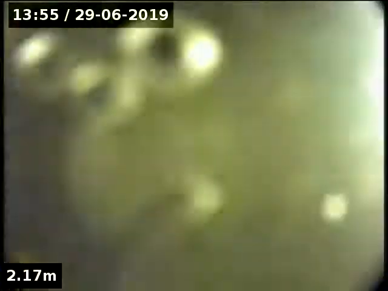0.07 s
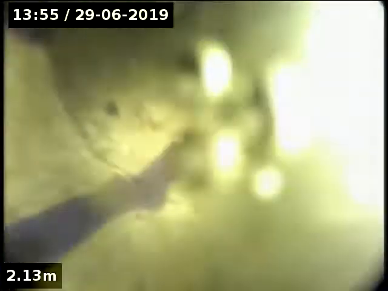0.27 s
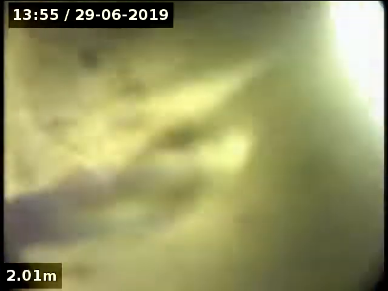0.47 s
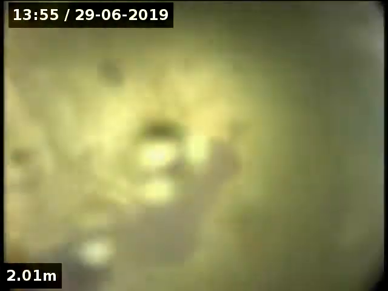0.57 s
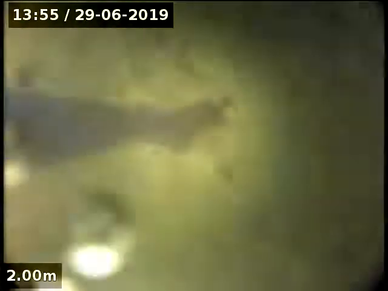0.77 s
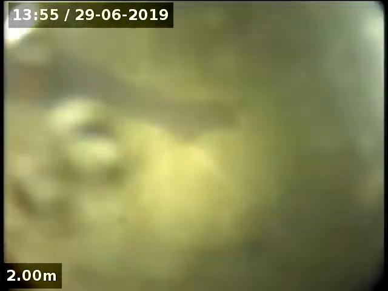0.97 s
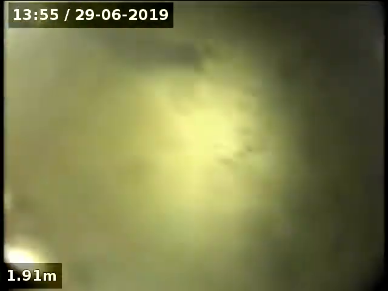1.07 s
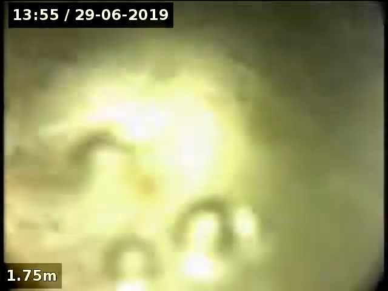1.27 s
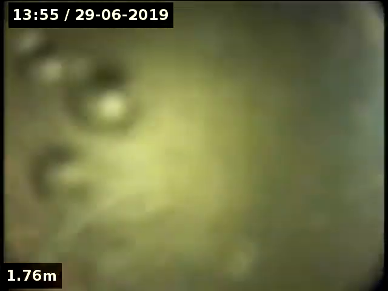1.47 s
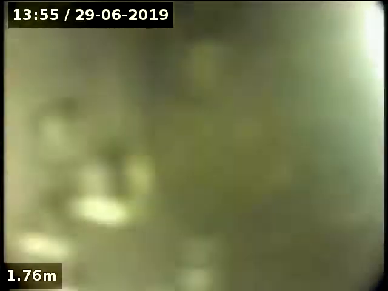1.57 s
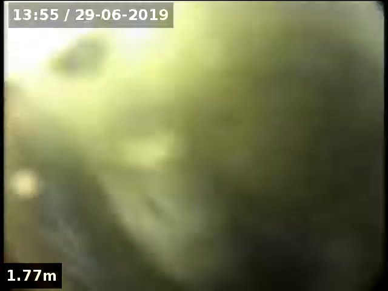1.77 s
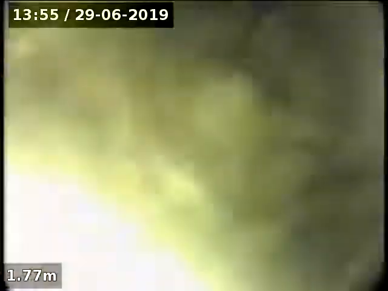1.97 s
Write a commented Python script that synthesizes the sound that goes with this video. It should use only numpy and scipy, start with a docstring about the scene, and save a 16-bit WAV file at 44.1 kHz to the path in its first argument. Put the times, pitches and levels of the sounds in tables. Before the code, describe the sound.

A flexible rod drags through a drain pipe, heard close on a small, hissy microphone. Faint hollow rubs and a short bright scrape come around 0.1 s, bumps at 0.2 s, sparse thuds and a light knock at 0.5-0.6. Hard, rattling knocks cluster at 0.85-1.1, loudest near 1.03, with another at 1.16. Sound drops out at 1.37-1.48; muffled bumps follow from 1.6 to 1.9.

```python
"""Rod dragged through a drain pipe

A flexible rod is drawn back through a drain pipe, heard by a small cheap recorder.
Short pushes make dull bumps and rattles in the recorder's case; filtered noise makes the drag and scrape.
Brief tones are the rod's rubs. One light knock and three hard ones, each of one or more contacts, ring the reel.
The recorder hisses, bends loud peaks upwards, has a deep notch at 4 kHz, ticks once and drops out once."""
import sys
import numpy as np
from scipy import signal
from scipy.fft import rfft, irfft, next_fast_len
from scipy.io import wavfile
from scipy.ndimage import uniform_filter1d

SR = 44100
rng = np.random.default_rng(int(sys.argv[2]) if len(sys.argv) > 2 else 0)


def convert_level_to_amplitude(level_db):
    """Map a level in decibels to its linear amplitude factor."""
    exponent = np.asarray(level_db, float) / 20
    return 10 ** exponent


def dump_mix(stems):
    """Bounce the given channels to the path in sys.argv[1] as a 16-bit WAV at rate SR."""
    frames = np.atleast_2d(stems).T  # one column per channel
    limited = np.clip(frames, -1, 1)  # hard clip at full scale
    pcm = np.round(limited * 32767).astype(np.int16)
    wavfile.write(sys.argv[1], SR, pcm)


N = 88332
T = np.arange(N) / SR


def curve(rows):
    """Gain over time, drawn straight in dB between (t/s, level/dB) points."""
    t, db = np.array(rows, float).T
    return convert_level_to_amplitude(np.interp(T, t, db))


def colour(x, rows):
    """Make some pitches louder than others, following (f/Hz, level/dB) points."""
    pad = 4096  # mirrored sound at both ends keeps the filter from wrapping round
    size = next_fast_len(N + 2 * pad)
    f, db = np.array(rows, float).T
    hz = np.fft.rfftfreq(size, 1 / SR) + 1  # 1 Hz up, so the logarithm exists at zero
    gain = convert_level_to_amplitude(np.interp(np.log(hz), np.log(f), db))
    spectrum = rfft(np.pad(x, pad, "reflect"), size)
    return irfft(spectrum * gain, size)[pad:pad + N]


def unit(x):
    """Scale to an rms of 1, so that a level can be set afterwards."""
    return x / np.sqrt(np.mean(x ** 2))


def ring(x, hz, t60, phase=0.):
    """One tone set off by x, falling 60 dB in t60 seconds."""
    pole = np.exp(2j * np.pi * hz / SR - np.log(1000) / (t60 * SR))
    return signal.lfilter([np.exp(1j * phase)], [1, -pole], x).imag


def pushes(times, sizes, ms):
    """Bell-shaped pushes, ms wide at half height."""
    near = np.arange(-128, 129)  # samples around each push
    i = np.clip((times * SR).astype(int)[:, None] + near, 0, N - 1)
    offset_ms = (i / SR - times[:, None]) * 1000
    shape = np.exp(-4 * np.log(2) * (offset_ms / ms[:, None]) ** 2)
    return np.bincount(i.ravel(), (sizes[:, None] * shape).ravel(), N)


def flicker(rate, spread_db):
    """Random wander of a level: rate dB values a second, smoothed into each other."""
    k = int(SR / rate)
    steps = np.repeat(rng.standard_normal(N // k + 1), k)
    return convert_level_to_amplitude(spread_db * uniform_filter1d(steps, k)[:N])


# dull bumps, before the case shapes them: t/s, peak level/dB,
# width at half height/ms (held to 0.5-3), direction (+1 or -1)
BUMPS = [(0.0055, -20, 0.95, 1), (0.1976, -28.5, 0.39, 1), (0.211, -25, 1.8, -1), (0.2229, -22.5, 1.3, 1),
         (0.2304, -15, 0.68, 1), (0.2369, -32, 0.44, 1), (0.2547, -22, 0.59, -1), (0.4957, -18, 2.1, 1),
         (0.539, -15, 1.3, -1), (0.5552, -19.5, 1.4, 1), (0.7818, -21, 0.24, 1), (0.8315, -18.5, 0.9, -1),
         (0.8415, -15, 1.1, 1), (0.8483, -11, 1.24, 1), (0.8568, -22, 1.2, -1), (0.8766, -18, 0.38, 1),
         (0.8982, -29, 0.73, -1), (0.9042, -11, 0.56, 1), (0.9139, -17, 0.8, -1), (0.9271, -20, 0.6, 1),
         (0.9355, -20.5, 0.47, 1), (0.9461, -23.5, 0.73, 1), (0.9532, -21, 0.8, 1), (0.9847, -9, 0.91, 1),
         (0.9943, -8.5, 0.66, 1), (0.9998, -22, 0.38, -1), (1.0095, -2.5, 1.23, 1), (1.0208, -6, 0.84, 1),
         (1.0268, -7.5, 1.1, -1), (1.0463, -14, 0.49, 1), (1.0578, -28, 0.7, -1), (1.0735, -11, 1.35, 1),
         (1.0843, -13.5, 1.1, 1), (1.279, -18, 1.63, -1), (1.5615, -24, 0.42, 1), (1.6181, -17.5, 0.9, 1),
         (1.6288, -14.5, 1.4, 1), (1.6418, -25, 1.2, 1), (1.6536, -12.5, 0.58, -1),
         (1.6674, -10.5, 1.26, 1), (1.6781, -24, 0.8, -1), (1.6869, -9, 0.78, 1), (1.6935, -24, 0.72, -1),
         (1.7041, -18, 0.93, 1), (1.7623, -10.5, 2.6, 1), (1.7697, -17, 2.6, -1), (1.7812, -13, 1.13, 1),
         (1.7945, -19, 1.0, -1), (1.8439, -16, 1, -1), (1.8595, -19.5, 1.4, -1), (1.8658, -18, 1.1, 1),
         (1.8951, -18.5, 2.3, -1)]
# how hard the rod rattles, rms of the small random bumps before the case: t/s, level/dB
RATTLE = [(0, -24), (.03, -41), (.07, -52), (.09, -33), (.14, -48), (.21, -19), (.27, -44.5), (.47, -45.5),
          (.5, -45), (.55, -32.5), (.6, -41.5), (.8, -52.5), (.84, -26), (.91, -24), (.95, -33.5),
          (1.01, -12.5), (1.08, -36), (1.11, -49.5), (1.26, -44.5), (1.28, -25.5), (1.31, -49.5),
          (1.53, -52), (1.56, -26), (1.59, -39.5), (1.62, -28), (1.69, -22), (1.72, -47), (1.75, -27),
          (1.79, -27.5), (1.81, -34), (1.86, -23), (1.88, -42), (1.9, -30.5), (1.92, -70), (2, -61)]
# how the case passes a push: f/Hz, level/dB
CASE_RESPONSE = [(20, -37.5), (60, -23.5), (120, -6.5), (190, 1), (300, 2.5), (1000, 1.5), (9000, -1.5)]


def case():
    """Pushes pass straight to the microphone, lose their lows and ring the case briefly."""
    case_hz, case_t60_s, case_ring_db = 222, 0.013, -11.5
    rattles_per_s, rattle_ms = 420, 1.198  # each rattle is 0.56 to 1.63 times this long
    t, db, ms, direction = np.array(BUMPS, float).T
    bumps = pushes(t, np.sign(direction) * convert_level_to_amplitude(db), np.clip(ms, .5, 3))

    chance = rng.random((int(rattles_per_s * N / SR), 4))
    times = (130 + chance[:, 0] * (N - 260)) / SR
    sizes = np.where(chance[:, 1] < .6, 1, -1) * (0.84 + chance[:, 2])
    rattle = pushes(times, sizes, rattle_ms * (0.56 + 1.07 * chance[:, 3]))

    x = bumps + unit(rattle) * curve(RATTLE)
    ring_gain = convert_level_to_amplitude(case_ring_db) * 2 * np.pi * case_hz / SR
    x = x + ring_gain * ring(x, case_hz, case_t60_s, 1.47)
    return colour(x, CASE_RESPONSE)


# how strongly the rod drags along the pipe wall, before the recorder: t/s, level/dB
DRAG = [(0, -34), (.07, -35.5), (.13, -32.5), (.19, -29.5), (.25, -32), (.3, -39.5), (.45, -52),
        (.57, -43.5), (.59, -33), (.63, -50), (.72, -36.5), (.78, -33), (.83, -37), (.9, -26), (.96, -31),
        (1.0, -28.5), (1.06, -38), (1.12, -42), (1.14, -53), (1.19, -33.5), (1.25, -50), (1.36, -44.5),
        (1.48, -53.5), (1.66, -39.5), (1.73, -51.5), (1.93, -51), (2, -56)]
# resonances of the pipe: f/Hz, nominal width/Hz, relative level/dB
PIPE = [(300, 150, -20.5), (588, 120, 6), (830, 230, 5.5), (1156, 410, -2.5), (1600, 120, -9),
        (2240, 290, -25.5)]


def drag():
    """Stick-slip grit rings the pipe's resonances, each wandering in level on its own."""
    # steady noise in which about one sample in a hundred is much larger
    grit = rng.standard_normal(N) * (0.61 + (rng.random(N) < .01) * 4)
    x = 0
    for hz, width, db in PIPE:
        x = x + convert_level_to_amplitude(db) * flicker(40.18, 4.3) * unit(ring(grit, hz, 2.9 / width))
    x = colour(x, [(20, -3), (2600, 0), (4000, -22.5), (9000, -51)])
    return unit(x) * curve(DRAG)


# colour of the steady hiss: f/Hz, relative level/dB per Hz
HISS = [(20, -25), (40, -15), (100, -6), (200, 1.5), (500, -0.5), (900, 0.5), (1500, -6.5), (2300, -15.5),
        (3100, -29), (3600, -28.5), (4000, -51.5), (5000, -69)]
# level of the hiss between 1 and 3 kHz, before its wander and the recorder: t/s, level/dB
SWELL = [(0, -38), (.05, -63), (.3, -51.5), (.6, -51.5), (.7, -53.5), (1.48, -55.5), (1.65, -46),
         (1.75, -51), (1.9, -49.5), (1.97, -43.5), (2, -44)]


def hiss():
    """Steady noise floor, with a middle band that swells now and then."""
    floor = unit(colour(rng.standard_normal(N), HISS)) * convert_level_to_amplitude(-44) * flicker(12, 1.1)
    middle = colour(rng.standard_normal(N), [(600, -37), (1300, -1.5), (1800, 1), (2200, -1.5),
                                             (2700, -12.5), (3400, -17.5), (4500, -54.5)])
    return floor + unit(middle) * curve(SWELL) * flicker(30, 4.3)


# colour of the high hiss: f/Hz, relative level/dB per Hz
TOP_HISS = [(2500, -35.5), (4100, -3), (4900, -8.5), (6800, -0.5), (7600, -7), (8300, -19.5), (9000, -49)]
# rise and fall of the high hiss around its base level: t/s, level/dB
TOP_SWELL = [(0, 8), (.06, -2), (.3, -2.5), (.5, 3.5), (.7, 3), (1.0, 6), (1.3, 0.5), (1.5, 3), (1.6, -2.5),
             (1.68, 7.5), (1.75, 1), (2, 2.5)]


def top_hiss():
    """Very faint treble noise that slowly comes and goes."""
    base_db = -69
    return unit(colour(rng.standard_normal(N), TOP_HISS)) * convert_level_to_amplitude(base_db) * curve(TOP_SWELL)


# low rumble, before its wander and the recorder: t/s, level/dB
RUMBLE = [(0, -53.5), (.1, -46), (.3, -60), (.37, -50), (.44, -61), (.52, -46.5), (.62, -65), (.74, -52.5),
          (.8, -64.5), (1.3, -61), (1.48, -61), (1.56, -42.5), (1.65, -53.5), (1.8, -52), (1.92, -53.5),
          (2, -66)]


def rumble():
    """A faint rumble: noise kept mostly below 150 Hz."""
    low = colour(rng.standard_normal(N), [(25, -12.5), (70, 7), (130, 8), (220, -32)])
    return unit(low) * curve(RUMBLE) * flicker(16, 3)


# short tonal rubs of the rod on the wall: t/s, length/s, f/Hz, level/dB (before the wander)
RUBS = [(0.03, .016, 518, -28.5), (0.047, 0.017, 548, -28), (.134, 0.015, 510, -27),
        (0.152, 0.014, 840, -27), (0.234, 0.0128, 677, -26.5), (0.776, 0.0075, 556, -29),
        (0.879, 0.007, 2600, -30.5)]


def rubs():
    """Each rub is a brief, slightly unsteady tone that swells and fades."""
    out = 0
    for start, length, hz, db in RUBS:
        s = T - start
        env = np.abs(np.sin(np.pi * np.clip(s / length, 0, 1))) ** 1.4
        out = out + convert_level_to_amplitude(db) * env * np.sin(2 * np.pi * hz * s) * np.sqrt(2)
    return out * flicker(150, 1.4)


# colour of the scrape: f/Hz, relative level/dB per Hz
SCRAPE = [(300, -36.5), (1200, -12), (1750, 1), (2100, -10.5), (2700, -3), (3100, 4.5), (3500, -14.5),
          (4500, -12), (5200, -6), (6000, -11), (6900, -11), (7500, -19), (8200, -20), (9000, -46)]


def scrape():
    """A bright hiss of noise that rises fast, holds and dies away."""
    start_s, rise_s, hold_s, fall_db_per_s, level_db = 0.074, 0.051, 0.043, 132.5, -39.5
    s = T - start_s
    rise = np.clip(s / rise_s, 0, 1) ** 0.49
    fall = convert_level_to_amplitude(-fall_db_per_s * np.clip(s - rise_s - hold_s, 0, 9))
    noise = unit(colour(rng.standard_normal(N), SCRAPE))
    return noise * rise * fall * flicker(90, 1.5) * convert_level_to_amplitude(level_db)


# hard contacts of the knocks, used by knocks() and snap(): t/s, strength level/dB, contact width/ms
KNOCKS = [(.5865, -27.5, 0.89), (.8795, -13.5, 0.25), (.8815, -15, 0.23), (.8836, -13.5, 0.28),
          (.8865, -6.5, 0.3), (.8905, -12, .45), (.8958, -13.5, 0.32), (.9072, -8, 0.71),
          (1.0337, -10.5, 0.38), (1.0352, -10, 0.21), (1.0383, -5.5, 0.56), (1.1612, -12.5, 0.22),
          (1.163, -8.5, 0.28), (1.165, -14, 0.22), (1.1672, -13, 0.45)]
# tones of the reel: f/Hz, relative level/dB, time to fall 60 dB/s
REEL = [(507, -13, .06), (648, -10, 0.061), (765, -1.5, 0.048), (929, -1, 0.039), (1252, -6.5, 0.035),
        (1470, -3, .03), (1627, -2, 0.021), (1840, -3.5, 0.018), (2175, -8.5, 0.039), (2600, -8, .025),
        (3050, -29, .03)]


def knocks():
    """Each contact cracks, rings the reel's tones in its own mix and leaves a short noisy tail."""
    crack_db, tail_db, tail_t60_s = -5.5, -9.5, 0.091
    t, strength_db, ms = np.array(KNOCKS, float).T
    mix_db = 2.5 * rng.standard_normal((len(KNOCKS), len(REEL)))
    reel = 0
    for j, (hz, db, t60) in enumerate(REEL):
        # dividing by the width gives short and long contacts equal area
        hits = pushes(t, convert_level_to_amplitude(strength_db + mix_db[:, j]) / ms * 0.24, ms)
        reel = reel + convert_level_to_amplitude(db) * 0.042 * ring(hits, hz, t60)

    crack = pushes(t, convert_level_to_amplitude(strength_db), ms)
    crack = signal.sosfilt(signal.butter(1, 300, "high", fs=SR, output="sos"), crack)

    s = T[:N // 4]
    tail = rng.standard_normal(N // 4) * np.exp(-np.log(1000) * s / tail_t60_s)
    tail = tail * np.minimum(s / 0.0013, 1)  # fades in over 1.3 ms
    noisy_tail = signal.fftconvolve(crack, tail)[:N]
    return reel + convert_level_to_amplitude(crack_db) * crack + convert_level_to_amplitude(tail_db) * 0.091 * noisy_tail


# colour of the sharp top of a contact: f/Hz, relative level/dB per Hz
SNAP = [(1500, -18.5), (2600, 3.5), (3500, 1), (4800, -4), (6200, 2.5), (7500, -5), (8800, -27)]


def snap():
    """The sharp treble burst of each hard contact; shorter contacts snap more."""
    snap_db, snap_t60_s = -30.5, 0.014
    t, strength_db, ms = np.array(KNOCKS, float).T
    s = T[:, None] - t
    size = convert_level_to_amplitude(strength_db) * (0.26 / ms) ** 2.0
    decay = (s > 0) * np.exp(-np.log(1000) * np.abs(s) / snap_t60_s)
    env = (size * decay).sum(axis=1)
    return unit(colour(rng.standard_normal(N), SNAP)) * env * convert_level_to_amplitude(snap_db)


def scene():
    """All sources added together at the one microphone."""
    noises = hiss() + top_hiss() + rumble()
    rod = drag() + rubs() + scrape()
    return (case() + rod + noises + knocks() + snap())[None]


def top_cut(x):
    """Nothing passes above the cut-off."""
    return signal.sosfilt(signal.butter(12, 8950, fs=SR, output="sos"), x)


# recorder response with its notch at 4 kHz: f/Hz, level/dB
RESPONSE = [(20, -7), (2800, 1.5), (3300, -1), (3600, -3.5), (4000, -19), (4400, -4.5), (4900, 3),
            (8300, -5.5), (8900, -35), (9200, -85)]


def record(dry):
    """Lopsided preamp, notched response, a digital tick and one dropout."""
    bend = 0.54  # share of the squared signal, which pushes loud peaks upwards
    tick_s, tick_db, tick_ms = 1.5765, -31, .06
    drop_start_s, drop_end_s, drop_edge_s = 1.3657, 1.4758, .001
    x = colour(dry[0] + bend * dry[0] ** 2, RESPONSE)
    x = signal.sosfilt(signal.butter(2, 30, "high", fs=SR, output="sos"), x)
    x = x + pushes(np.array([tick_s]), convert_level_to_amplitude([tick_db]), np.array([tick_ms]))
    outside_drop_s = np.maximum(drop_start_s - T, T - drop_end_s)
    x = x * np.clip(outside_drop_s / drop_edge_s, 0, 1)
    return top_cut(x[None])


dry = scene()
out = record(dry)
dump_mix(out)
```